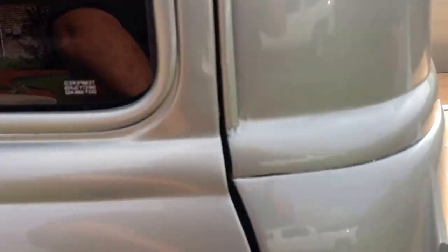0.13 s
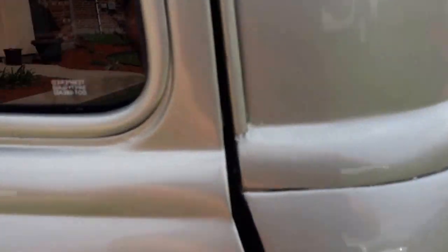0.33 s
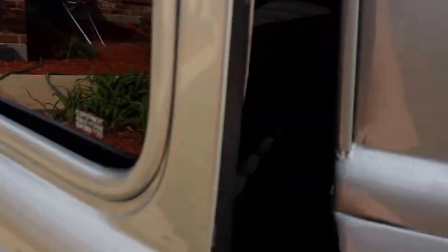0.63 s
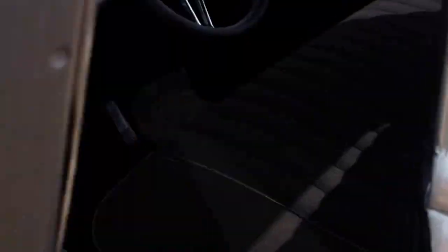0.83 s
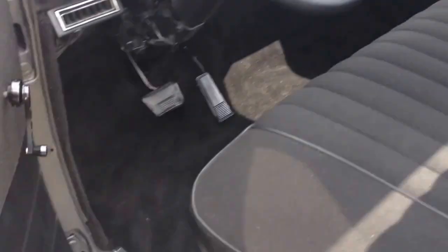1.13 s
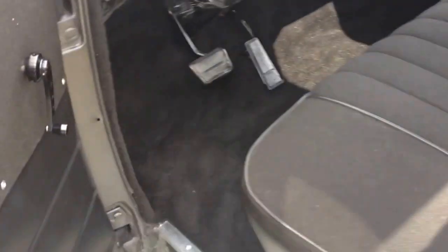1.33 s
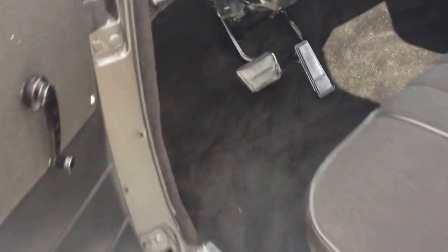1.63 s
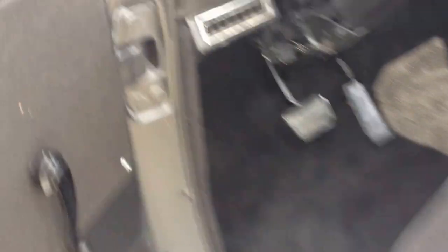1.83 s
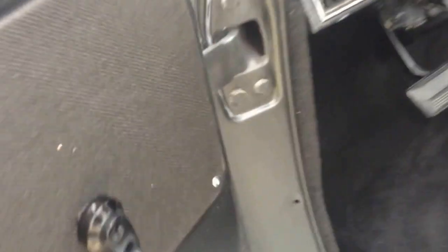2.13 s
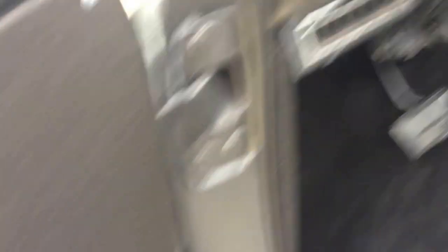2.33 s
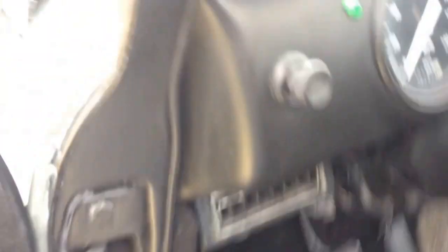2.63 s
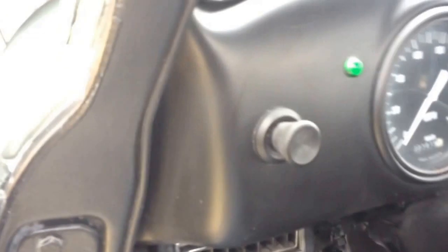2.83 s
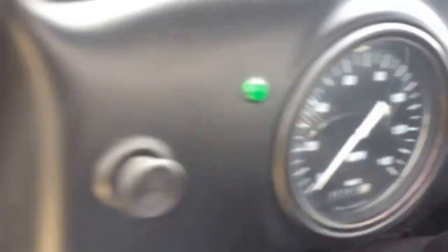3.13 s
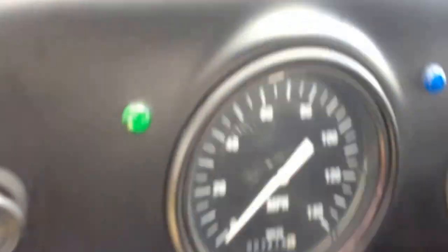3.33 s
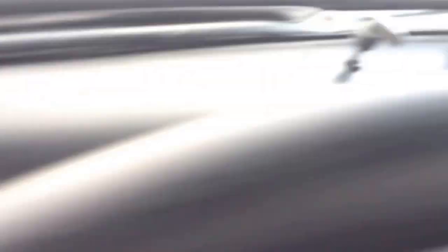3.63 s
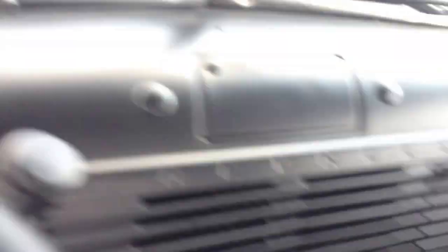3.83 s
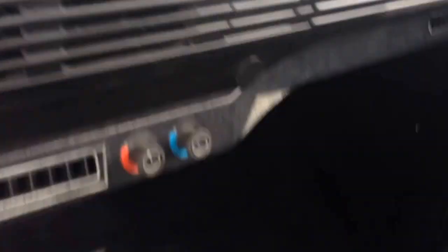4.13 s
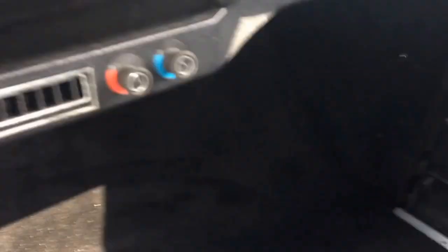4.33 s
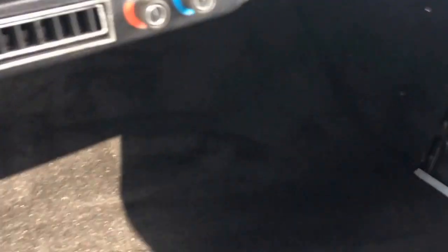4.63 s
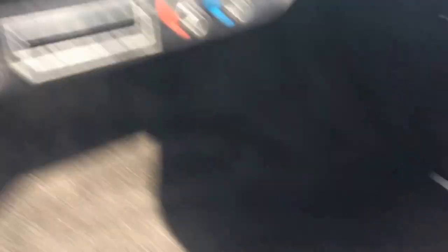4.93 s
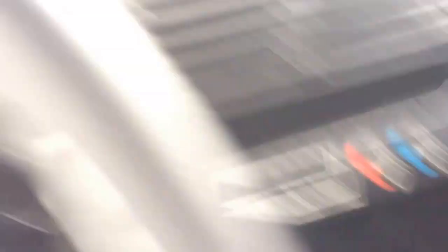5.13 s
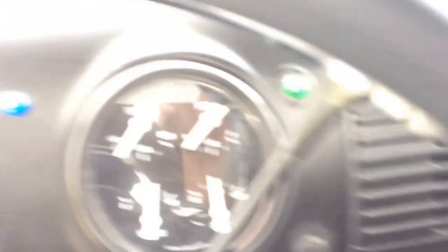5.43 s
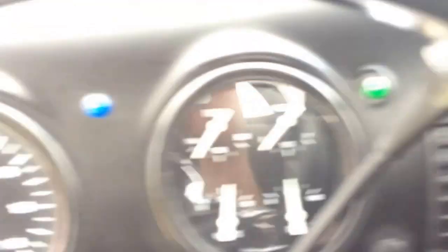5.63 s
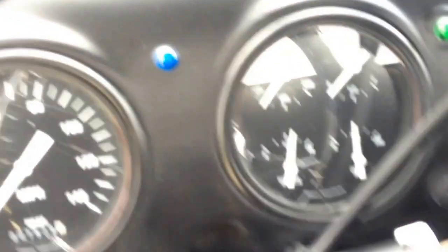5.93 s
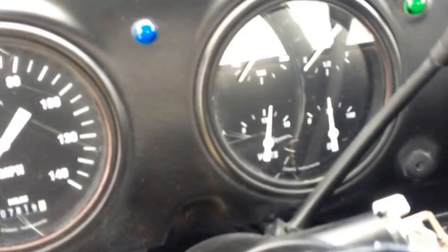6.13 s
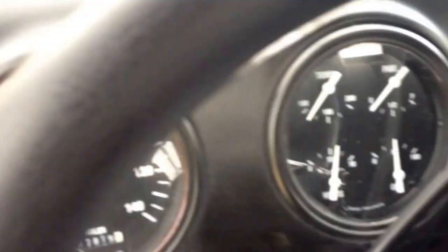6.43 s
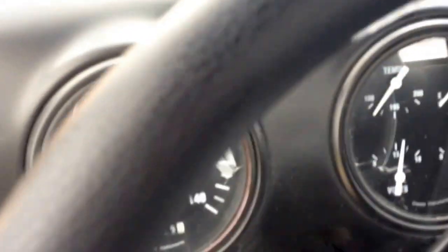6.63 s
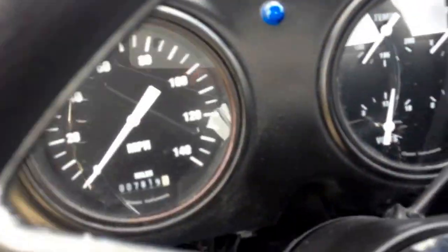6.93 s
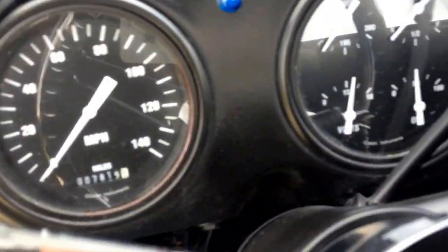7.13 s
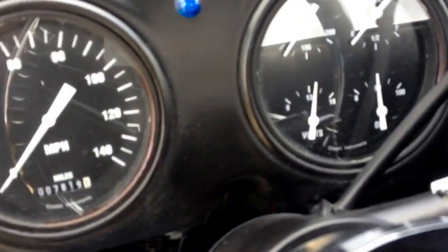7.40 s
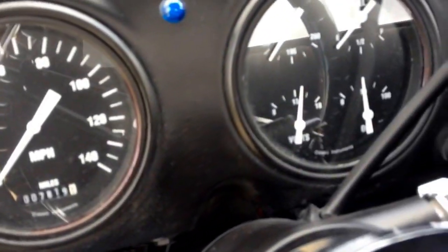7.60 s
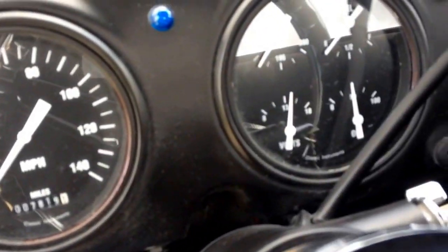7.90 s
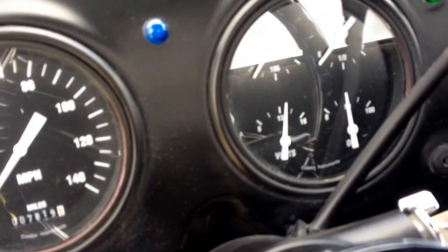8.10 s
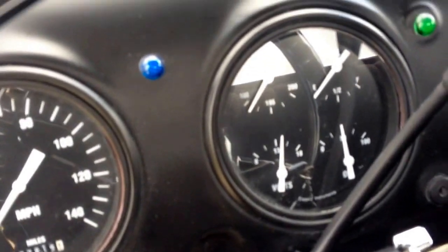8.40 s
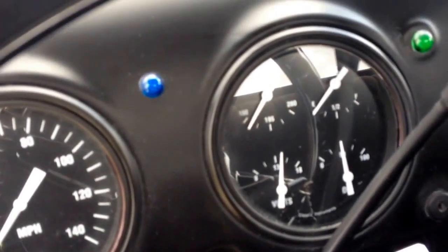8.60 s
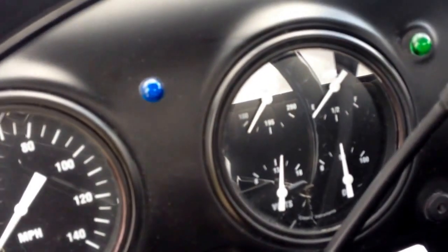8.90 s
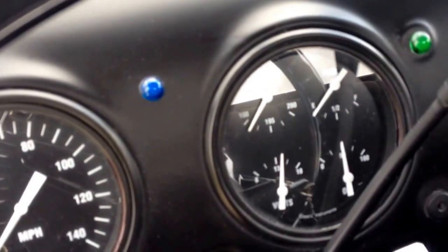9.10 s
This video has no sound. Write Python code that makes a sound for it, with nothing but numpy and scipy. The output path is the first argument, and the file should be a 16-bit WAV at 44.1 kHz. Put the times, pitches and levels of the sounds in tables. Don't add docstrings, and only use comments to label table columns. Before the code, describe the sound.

Close door-latch clunk over an uneven V8 idle outdoors, then slight seat creaks and key ticks inside the cab before a rising two-step rev.

```python
import sys
import numpy as np
from scipy import signal
from scipy.fft import rfft, irfft
from scipy.io import wavfile
from scipy.ndimage import uniform_filter1d

SR = 44100
rng = np.random.default_rng(int(sys.argv[2]) if len(sys.argv) > 2 else 0)


def to_wav(s):
    ch = np.atleast_2d(s).T
    pcm = np.round(np.clip(ch, -1, 1) * 32767)
    wavfile.write(sys.argv[1], SR, pcm.astype(np.int16))


def field_ratio(decibels):
    return 10 ** (np.asarray(decibels, dtype=float) / 20)


N = 408366

# time in seconds, four-stroke cycles per second
CRANK_SPEED = [(0.0, 6.934), (0.7, 6.772), (1.25, 6.829), (2.6, 6.775), (3.7, 6.685), (4.4, 6.755),
               (5.4, 6.806), (6.0, 6.666), (7.1, 6.832), (7.8, 6.702), (7.95, 6.852), (8.12, 7.914),
               (8.38, 10.321), (8.62, 11.72), (8.87, 12.4), (9.0, 14.4), (9.14, 17.0), (9.26, 17.3)]
IDLE_SPEED = 6.77
FIRST_FIRING = .8
# time in seconds, opening from 0 to 1
THROTTLE = [
    (7.9, 0.09),
    (8.06, 0.01),
    (8.4, 0.21),
    (8.8, 0.2),
    (8.92, 0.56),
    (9.02, 0.98),
    (9.1, 0.83),
    (9.19, 0.62),
    (9.26, 0),
]
# time in seconds, exhaust path in dB, engine bay path in dB,
# depth into the cab from 0 to 1
LISTENER = [(0, -2.5, 0, 0.1), (.5, -4, -2.5, 0), (1.0, -2, -1, .3), (1.5, -1.6, 0.5, .4),
            (2.6, 0, -3, .55), (3.1, 0.1, -1.2, 0.5), (3.55, -1, -2.5, 0.65), (3.95, -8.5, -6.5, .85),
            (4.15, -12.5, -7, 1.05), (4.8, -13, -8, 0.94), (5.3, -6, -5.5, 0.77), (5.9, -3, -5.5, 0.65),
            (6.5, -1.6, -5.5, 0.7), (7.2, -2.5, -5.5, 0.8), (7.8, -3, -6, .75), (8.4, -2, -7.5, 0.9),
            (9.26, -1.5, -7.5, 0.6)]

NEAR_BANK = [0, 1, 1, 0, 1, 0, 0, 1]
BLOW_DB = [.1, -6, 1, 3.5, 4.6, -.5, -5.2, 2.4]
RUNNER_MS = [1, .1, 2.1, -1.4, .5, .5, .6, 0]
BURN_SPREAD_DB, BURN_SPREAD_S = .6, .00005
PIPE_LEAD_S = .012
# Hz, t60 in seconds, near pipe in dB, far pipe in dB
LOW_PIPE = [(144.7, .196, -4.2, -8), (165.5, .064, -7.8, -11.1), (194.5, .144, -6.8, -12.8),
            (224.9, .066, -16.3, -12.7)]
HIGH_PIPE = [(250.3, .226, -2.9, -7.9), (273.5, .236, -3.5, -2.6), (351, .048, -22, -30)]
CAB_BOOM_DB = 20.5
# idle level in dB, share of its path,
# rise at full throttle in dB, rise per doubling of speed in dB
TONE_LAW = (-62.5, 0.33, 22, -8)
LOW_PIPE_LAW = (-27, 0.72, 6, 3)
HIGH_PIPE_LAW = (-21.5, 1.22, 13, 1.5)
HEADER_LAW = (-40.5, 0.5, 12, 6)
DRONE_LAW = (-57.5, 0.65, 7.5, 0.7)
ROAR_LAW = (-33, 0.5446, 6, 6.5)
HISS_LAW = (-43.5, 1.24, 16, 0)
PUFF_LAW = (14.5, 0.98, 12.5, -10.5)
# order, Hz, width in Hz, change in dB
TONE_MEETS = (7.96, 64.5, 8.7, 16)
LOW_PIPE_MEETS = (17, 187, 7.5, -2)
HIGH_PIPE_MEETS = (24.33, 270, 11, 6.2)

# Hz, t60 in seconds, level in dB
HEADER_WALLS = [(402, 0.085, 3.9), (477, 0.072, -2.5), (532, 0.059, -6.5)]
HEADER_BLOW_DB = [-10, -5.5, .1, -7, -2.5, 0, -11, -18.5]
HEADER_LEAD_S = 0.01113
# middle in seconds, half-length in seconds, change in dB
HEADER_HIDDEN = (2.0, .6, -7)
DRONE_ORDERS = (11, 13)
# Hz, width in Hz, rise in dB
MUFFLER = (171.3, 50, 36.7)

LEAK_DB = [-16, -4, 0, -15, -1, -16, -14, -3]
# low edge in Hz, high edge in Hz, level in dB
LEAK_BANDS = [(1570, 3050, 1.5), (4070, 4570, 3.5), (5460, 7600, 0), (9400, 13700, -4)]
# middle in seconds, half-length in seconds, change in dB
LEAK_HIDDEN = (3.38, 0.45, -12)
# Hz, t60 in seconds, level in dB
MANIFOLD = [(1032.6, 0.081, 7), (1928, 0.07, -3.5), (4750, 0.057, -5.5), (7100, 0.0028, -29)]
# Hz, density in dB per Hz
ROAR_COLOUR = [(180, -2.5), (300, -13), (334, -22), (407, -14.5), (510, -15), (594, -23.5), (717, -23),
               (778, -19), (876, -27), (1040, -18), (1310, -27), (1900, -31.5), (5000, -42.5), (6500, -90),
               (11000, -120)]
# Hz, density in dB per Hz
HISS_COLOUR = [(1470, -1), (2500, 2), (3390, -1.5), (4230, -2), (5280, -5), (5870, -6), (14200, -10.5),
               (15500, -8)]

# time in seconds, peak in dB, crack in dB, boom in dB
KNOCKS = [(0.127, -10.5, -21, -5), (0.172, -20, -20, 9), (0.19, -13, -28, 3), (0.209, -19.5, -28, 10),
          (0.238, -7.5, -23, -0.5), (0.254, -3.5, -15, -8), (0.268, 2, -6, 0), (0.278, -5.5, 3.5, -3),
          (0.29, -7, -3, -12), (0.304, -17, -16, -17), (0.334, -11.5, -12, -2), (0.764, -17.5, -21, 0),
          (1.236, -18, -25, 8), (1.252, -14.5, -31, -6), (1.269, -17, -27, 9), (1.424, -16, -23, 0.5),
          (1.439, -19.5, -22, 7.5)]
# Hz, t60 in seconds, level in dB
DOOR_PANEL = [(422.2, 0.012, 2), (577, 0.011, 1), (885, 0.015, -32), (1150, 0.0071, -25)]
# Hz, t60 in seconds, level in dB
DOOR_BOOM = [(169.7, 0.096, -2), (242, 0.038, 4.5)]
# Hz, t60 in seconds, level in dB
LATCH = [(1120, 0.0095, 6), (1480, 0.005, 1.5), (2190, 0.0064, 2.4), (2690, 0.004, -2.5),
         (3600, 0.0033, -5)]
CRACK_LO_HZ, CRACK_HI_HZ = 1100, 4200
# peak time in seconds, peak in dB, swell in seconds
CREAKS = [
    (.29, -15, 0.17),
    (.4, -34.5, 0.14),
    (.77, -30, 0.026),
    (1.27, -20.5, 0.032),
    (1.44, -28, 0.033),
    (3.68, -36, .6),
]
CREAK_SWELL_DB, CREAK_FALL_DB_PER_S = 20.5, 545

# time in seconds, peak in dB, rattle t60 in seconds, dull part in dB
TICKS = [(3.2034, -18.5, 0.044, -7), (3.232, -15.5, 0.024, -13), (3.4555, -47, 0.019, -7),
         (3.7015, -38, 0.035, -3), (3.7898, -31.5, 0.032, -8.5), (3.869, -32, 0.019, -7),
         (4.145, -43, 0.021, 2), (4.2357, -34.5, 0.038, -4), (4.2535, -37, 0.05, -23),
         (4.3124, -37, 0.058, -22), (5.7797, -43, 0.026, 4.5), (5.864, -30, 0.035, -10.5),
         (5.9395, -36, 0.054, -12), (5.996, -36.5, 0.041, -6), (6.015, -34, 0.041, -17)]
# Hz, t60 in seconds, level in dB
KEYS = [(9800, 0.022, -5), (10400, .015, -4), (12990, .025, -8)]
# Hz, t60 in seconds, level in dB
TRIM = [(560, .03, -7), (800, 0.033, -5), (1140, 0.0054, 12), (2100, 0.025, 2.5), (3550, 0.018, -5.5)]

# from in seconds, to in seconds, level in dB
BLOWER = [
    (1.6, 2.8, -48),
    (3.72, 3.87, -44),
    (4.42, 9.4, -48.5),
]
BLOWER_HZ, BLOWER_FAINT_DB, BLOWER_TURN_S = 786, -73, 0.43
# Hz, density in dB per Hz
RUMBLE_COLOUR = [(20, -36), (43, -27), (51, -6), (86, -11), (110, -12.5), (130, 6.5), (170, -37),
                 (290, -120)]
RUMBLE_DB = -41


def firings():
    cycles = np.cumsum(in_time(CRANK_SPEED)[0]) / SR
    count = np.arange(int(cycles[-1] * 8))
    at = np.interp((count + FIRST_FIRING) / 8, cycles, np.arange(N) / SR)
    return cycles, at, count % 8


def exhaust(cycles, at, cylinder):
    path_db, _, depth = in_time(LISTENER)
    tone_db = level(TONE_LAW, path_db) + CAB_BOOM_DB * depth + meeting(*TONE_MEETS)
    low_db = level(LOW_PIPE_LAW, path_db) + meeting(*LOW_PIPE_MEETS)
    high_db = level(HIGH_PIPE_LAW, path_db) + meeting(*HIGH_PIPE_MEETS)
    chance = rng.standard_normal((len(at), 2))
    blow = field_ratio(np.take(BLOW_DB, cylinder) + BURN_SPREAD_DB * chance[:, 0])
    at = at - PIPE_LEAD_S + np.take(RUNNER_MS, cylinder) / 1000 + BURN_SPREAD_S * chance[:, 1]
    near = np.take(NEAR_BANK, cylinder)
    near_pipe = train(at, blow * near)
    far_pipe = -train(at, blow * (1 - near))
    out = field_ratio(tone_db) * tone(8 * cycles)
    for modes, level_db, low_cut_hz in ((LOW_PIPE, low_db, 115), (HIGH_PIPE, high_db, 200)):
        pipe = np.zeros(N)
        for k, (hz, t60, near_db, far_db) in enumerate(modes):
            blows = field_ratio(near_db) * near_pipe + field_ratio(far_db) * far_pipe
            pipe += (-1) ** k * ring(blows, hz, t60)
        out += field_ratio(level_db) * unit(band_twice(pipe, low_cut_hz, 690))
    return out


def header(at, cylinder):
    blow_db = np.take(HEADER_BLOW_DB, cylinder) + 1.9 * rng.standard_normal(len(at))
    walls = ring_modes(train(at - HEADER_LEAD_S, field_ratio(blow_db)), HEADER_WALLS)
    level_db = level(HEADER_LAW, in_time(LISTENER)[0]) + bump(np.arange(N) / SR, *HEADER_HIDDEN)
    return field_ratio(level_db) * unit(band_twice(walls, 327, 623))


def drone(cycles):
    level_db = level(DRONE_LAW, in_time(LISTENER)[0])
    return sum(field_ratio(level_db + meeting(k, *MUFFLER)) * tone(k * cycles) for k in DRONE_ORDERS)


def engine_bay(at, cylinder):
    path_db = in_time(LISTENER)[1]
    puff_db = level(PUFF_LAW, path_db) + bump(np.arange(N) / SR, *LEAK_HIDDEN)
    jets = np.zeros(N)
    for lo, hi, db in LEAK_BANDS:
        jets += field_ratio(db) * band(puff_gate(at, cylinder) * rng.standard_normal(N), lo, hi)
    hiss = coloured(HISS_COLOUR) + field_ratio(puff_db - 3.5) * jets
    gate = puff_gate(at, cylinder)
    manifold = ring_modes(gate * rng.standard_normal(N), MANIFOLD)
    roar = coloured(ROAR_COLOUR) * (1 + 0.51 * gate)
    roar += field_ratio(puff_db - 22.0) * manifold / manifold.std()
    return field_ratio(level(ROAR_LAW, path_db)) * roar + field_ratio(level(HISS_LAW, path_db)) * hiss


def puff_gate(at, cylinder):
    puffs = train(at - .003, field_ratio(np.take(LEAK_DB, cylinder) + 3 * rng.standard_normal(len(at))))
    gate = fade(fade(puffs, .025), .04)
    return gate / np.percentile(gate, 97)


def door():
    at, peak_db, bright_db, boom_db = np.transpose(KNOCKS)
    slips = (rng.random(N) < 600 / SR) * rng.standard_normal(N) * field_ratio(-1.5) * creak_gain()
    luck = rng.standard_normal((len(at), len(DOOR_PANEL)))
    panel = np.zeros(N)
    for k, (hz, t60, db) in enumerate(DOOR_PANEL):
        knocks = train(at, field_ratio(peak_db - 7.5 + 2.0 * luck[:, k]))
        panel += field_ratio(db) * ring(slips + knocks, hz, t60)
    boom = ring_modes(train(at, field_ratio(peak_db + boom_db)), DOOR_BOOM, -2.5)
    crack = fade(train(at, field_ratio(peak_db + bright_db)), .026) * rng.standard_normal(N)
    latch = ring_modes(crack, LATCH, -24.5) + field_ratio(-6.5) * crack
    latch = band(band(latch, CRACK_LO_HZ, CRACK_HI_HZ), CRACK_LO_HZ / 2, CRACK_HI_HZ)
    return band(panel, 255, 2000) + band_twice(boom, 127, 500) + latch


def creak_gain():
    t = np.arange(N) / SR
    gain = np.zeros(N)
    for s, db, swell in CREAKS:
        rising = CREAK_SWELL_DB * ((s - t) / swell) ** 2
        falling = CREAK_FALL_DB_PER_S * (t - s)
        gain += field_ratio(db - np.where(t < s, rising, falling))
    return gain


def ticks():
    bright, dull = np.zeros(N), np.zeros(N)
    for s, db, t60, dull_db in TICKS:
        i = int(s * SR)
        age = np.arange(min(SR // 5, N - i)) / SR
        bright[i:i + len(age)] += field_ratio(db - 0.5 - 60 * age / t60) * np.minimum(age / 0.0041, 1)
        dull[i:i + len(age)] += field_ratio(db + dull_db - 60 * age / (3.9 * t60)) * np.minimum(age / 0.0064, 1)
    ragged_db = 3 * unit(uniform_filter1d(rng.standard_normal(N), size=90)) - 1
    grain = rng.standard_normal(N) * field_ratio(ragged_db)
    rattle = bright * grain
    creak = dull * grain + 1e-18
    keys = ring_modes(rattle + 1e-18, KEYS, -20)
    trim = ring_modes(creak, TRIM, -21.0)
    return band(rattle, 1550, 10000) + keys + trim + field_ratio(12.0) * band(creak, 230, 3600)


def blower():
    t = np.arange(N) / SR
    gain = field_ratio(BLOWER_FAINT_DB)
    for start, end, db in BLOWER:
        gain = gain + field_ratio(db) * np.clip(np.minimum(t - start, end - t) / BLOWER_TURN_S + .5, 0, 1)
    wander = unit(uniform_filter1d(rng.standard_normal(N), size=4000))
    return gain * tone(np.cumsum(BLOWER_HZ + 2.18 * wander) / SR)


def rumble():
    return field_ratio(RUMBLE_DB) * coloured(RUMBLE_COLOUR)


def level(law, path_db):
    idle_db, share, throttle_db, doubling_db = law
    doublings = np.log2(in_time(CRANK_SPEED)[0] / IDLE_SPEED)
    return idle_db + share * path_db + throttle_db * in_time(THROTTLE)[0] + doubling_db * doublings


def bump(x, middle, width, db):
    return db * np.exp(-((x - middle) / width) ** 2)


def meeting(order, hz, width_hz, db):
    return bump(order * in_time(CRANK_SPEED)[0], hz, width_hz, db)


def in_time(rows):
    s, *columns = np.transpose(rows)
    return [np.interp(np.arange(N) / SR, s, c) for c in columns]


def unit(x):
    return x / np.sqrt(uniform_filter1d(x ** 2, size=SR // 2) + 1e-20)


def tone(cycles):
    return np.sqrt(2) * np.sin(2 * np.pi * cycles)


def train(at_s, size):
    out = np.zeros(N)
    at = np.round(np.asarray(at_s) * SR).astype(int)
    inside = (at >= 0) & (at < N)
    np.add.at(out, at[inside], np.asarray(size)[inside])
    return out + 1e-18


def ring(clicks, hz, t60):
    r, w = field_ratio(-60 / (t60 * SR)), 2 * np.pi * hz / SR
    return signal.lfilter([0, np.sin(w)], [1, -2 * r * np.cos(w), r * r], clicks)


def ring_modes(clicks, modes, shift_db=0):
    return sum(field_ratio(db + shift_db) * ring(clicks, hz, t60) for hz, t60, db in modes)


def fade(clicks, t60):
    return signal.lfilter([1], [1, -field_ratio(-60 / (t60 * SR))], clicks)


def coloured(points):
    hz, db = np.transpose(points)
    grid = np.maximum(np.fft.rfftfreq(N, 1 / SR), 1)
    colour_db = np.interp(np.log(grid), np.log(hz), db, left=-90, right=-90)
    x = irfft(rfft(rng.standard_normal(N)) * field_ratio(colour_db), N)
    return x / x.std()


def band(x, lo_hz, hi_hz):
    return signal.sosfilt(signal.butter(2, [lo_hz, min(hi_hz, .45 * SR)], "band", fs=SR, output="sos"), x)


def band_twice(x, lo_hz, hi_hz):
    return band(band(x, lo_hz, hi_hz), lo_hz, hi_hz)


def scene():
    cycles, at, cylinder = firings()
    engine = exhaust(cycles, at, cylinder) + header(at, cylinder) + drone(cycles) + engine_bay(at, cylinder)
    return (engine + door() + ticks() + blower() + rumble())[None]


def band_limit(x):
    return signal.sosfilt(signal.butter(12, 15610, fs=SR, output="sos"), x)


def record(dry):
    x = signal.sosfilt(signal.butter(2, 30, "high", fs=SR, output="sos"), dry)
    held = x / (1 + x ** 4) ** .25
    mix = signal.sosfilt(signal.cheby2(16, 60, 15800, fs=SR, output="sos"), held)
    return band_limit(mix)


dry = scene()
out = record(dry)
to_wav(out)
```